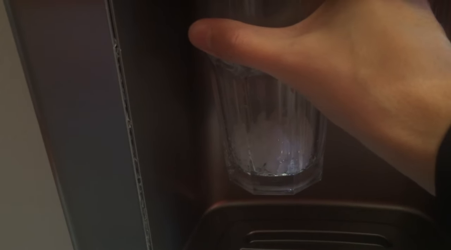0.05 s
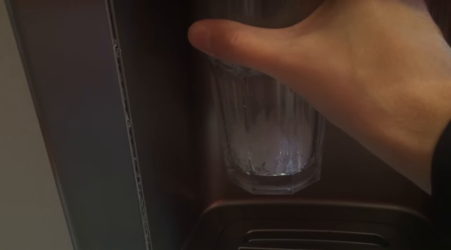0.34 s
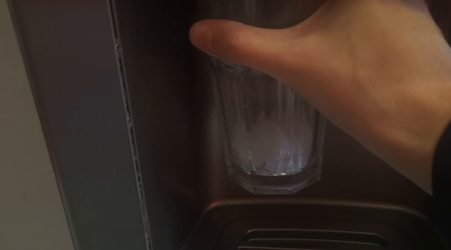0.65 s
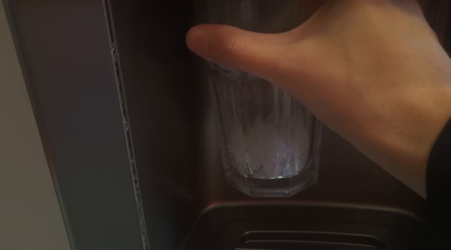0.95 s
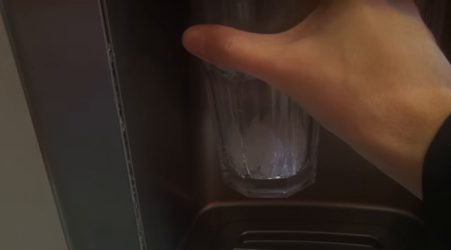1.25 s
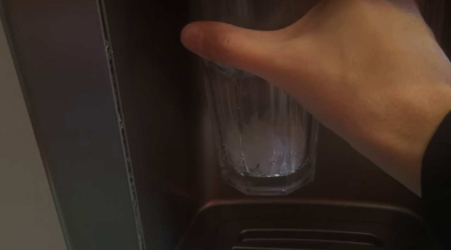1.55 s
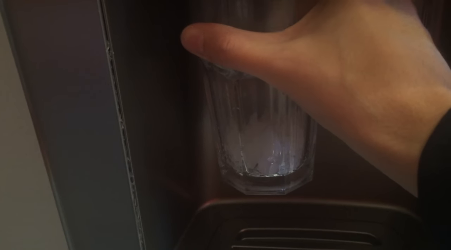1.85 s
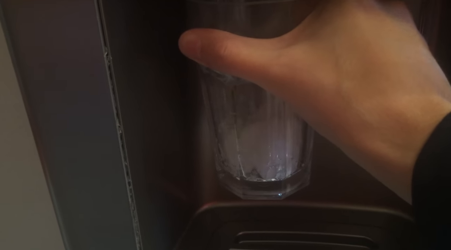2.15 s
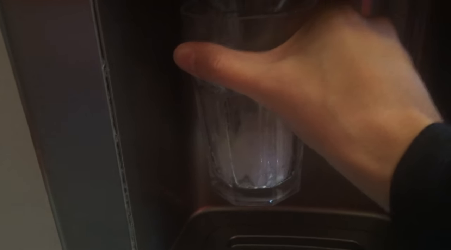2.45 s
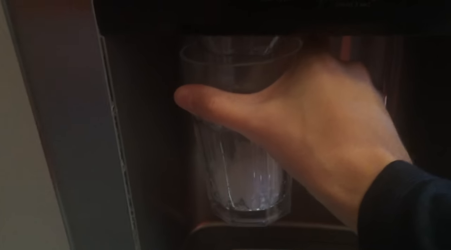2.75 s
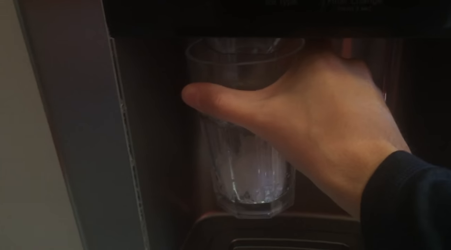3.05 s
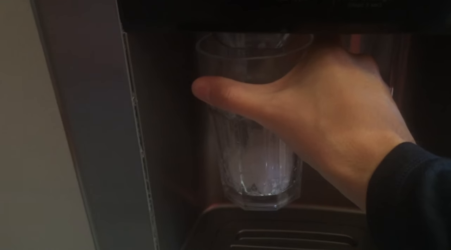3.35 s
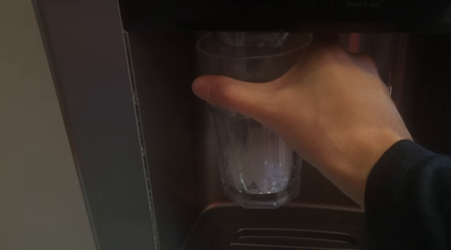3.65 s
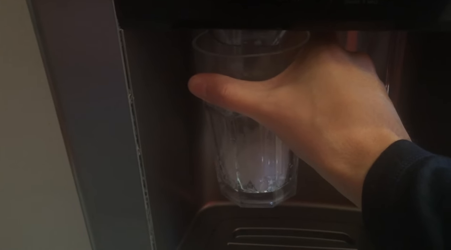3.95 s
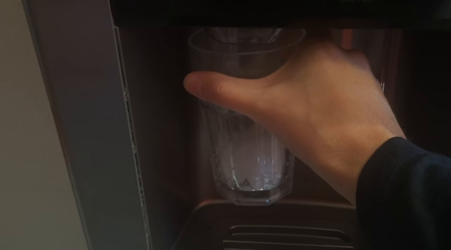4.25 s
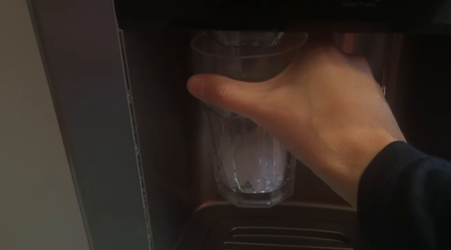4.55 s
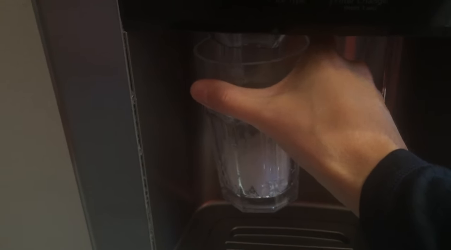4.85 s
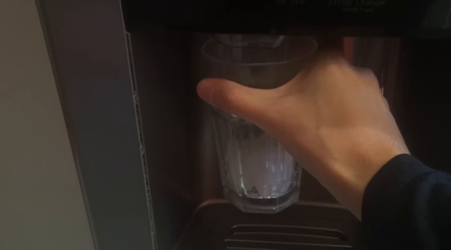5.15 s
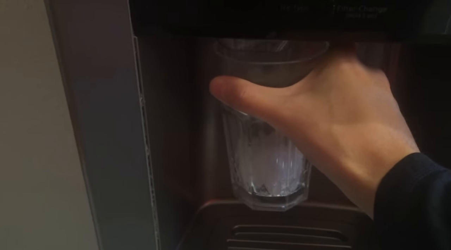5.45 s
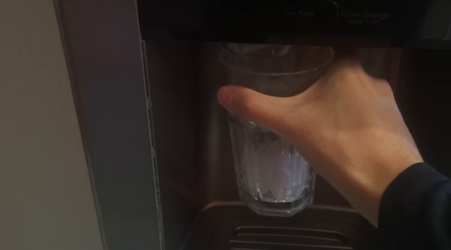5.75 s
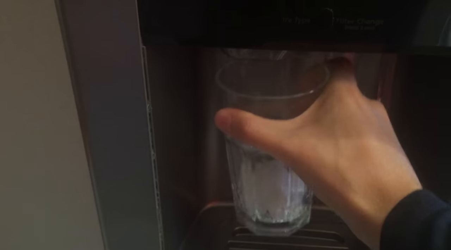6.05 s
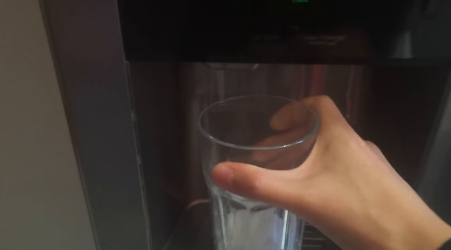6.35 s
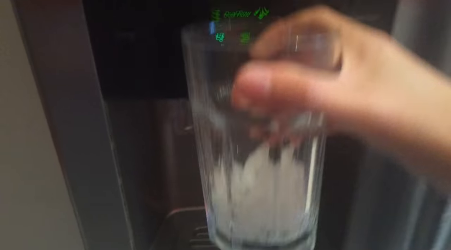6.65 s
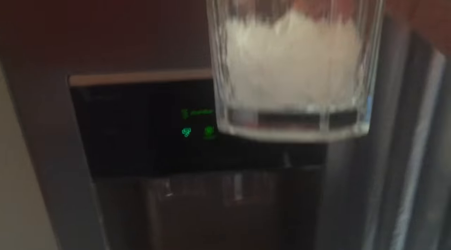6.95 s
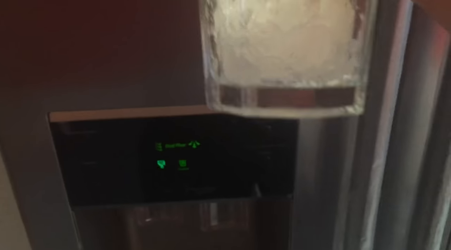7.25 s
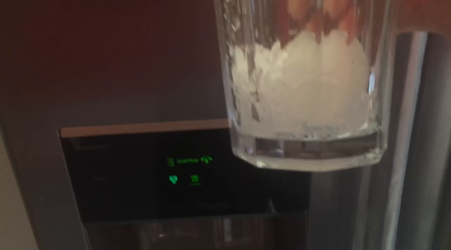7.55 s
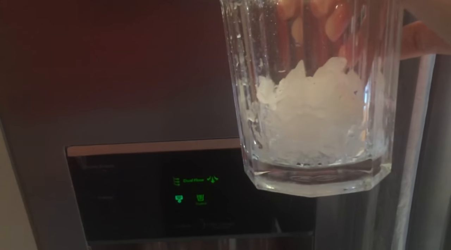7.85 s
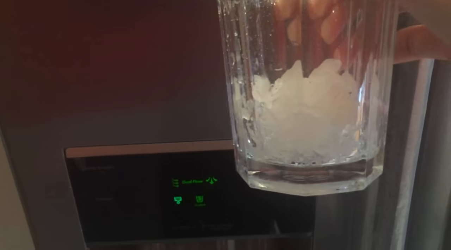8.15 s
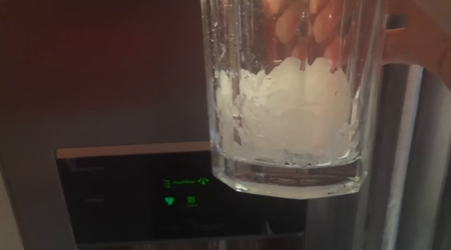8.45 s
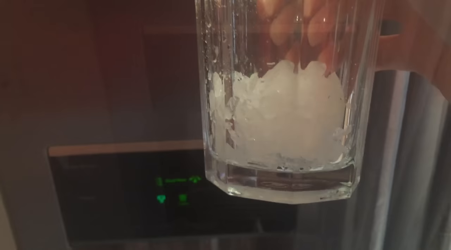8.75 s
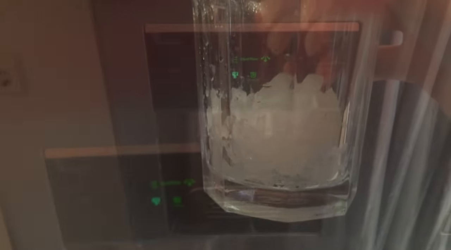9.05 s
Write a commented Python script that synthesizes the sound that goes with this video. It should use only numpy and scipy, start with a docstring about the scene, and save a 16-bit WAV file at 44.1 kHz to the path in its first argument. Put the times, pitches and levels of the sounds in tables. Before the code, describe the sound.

A refrigerator ice dispenser is running from the start, close to the microphone in a quiet kitchen. A geared motor hums and whirrs beneath uneven crunching as cubes crack and rattle inside a plastic housing. The crushing is loudest from about 1 to 2.4 seconds, with hollow thumps in the chute and a quick cluster of bright chips clinking into a glass around 2 seconds. More thumps come near 2.8 seconds and another sharp clink near 3.8. The grinding then thins to loose cubes knocking in the bin, before a final run of cracks from 4.8 seconds. The motor stops at about 5.2 seconds. Small plastic clicks follow until 6.3 seconds, then soft knocks and dull bumps as the glass is lifted away, with one more click and a brief rub at 8.5. Behind these, a very faint tick sounds once a second over low room tone.

```python
"""Crushed ice into a glass

A kitchen, one microphone close to the dispenser in the refrigerator door. A geared motor hums while
its blades grind and crack cubes in a plastic housing; chips drop and clink in a hand-held glass.
The motor stops, small clicks and soft bumps follow as the glass is lifted away, and farther off
something ticks faintly once a second."""
import sys
import numpy as np
from scipy import signal
from scipy.fft import rfft, irfft, next_fast_len
from scipy.io import wavfile
from scipy.ndimage import map_coordinates

SR = 44100
rng = np.random.default_rng(int(sys.argv[2]) if len(sys.argv) > 2 else 0)


def dump(signal):
    """Clip the signal to [-1, 1] and save it as 16-bit WAV at the path in sys.argv[1]."""
    limited = np.clip(np.atleast_2d(signal).T, -1, 1)
    pcm = np.round(limited * 32767).astype(np.int16)
    wavfile.write(sys.argv[1], SR, pcm)


N = 405719
TIME = np.arange(N) / SR
HIT = TIME[:SR // 4]  # time axis of one impact
STOP_S, SETTLED_S = 5.22, 5.5  # motor switched off, ice at rest
RING_ATTACK_S = .00087  # onset of ringing ice and glass


def amp(db):
    """Decibels to gain."""
    return 10 ** (np.asarray(db) / 20)


def unit(x):
    """x at rms 1."""
    return x / np.sqrt(np.mean(x ** 2) + 1e-20)


def along(points, hz):
    """(f/Hz, value) points read on a log axis."""
    f, v = np.transpose(points)
    return np.interp(np.log(hz + 1), np.log(f), v)


def curve(points):
    """(t/s, value) points read at every sample."""
    return np.interp(TIME, *np.transpose(points))


def wobble(rate):
    """A smooth random curve with rate knots a second."""
    return map_coordinates(rng.standard_normal(int(N * rate / SR) + 4), [TIME * rate])


def add(track, s, sound):
    """Mix a sound into the track at s seconds."""
    rest = track[max(round(s * SR), 0):][:len(sound)]
    rest += sound[:len(rest)]


def coloured(x, gain):
    """x through the causal (minimum-phase) filter with this gain of frequency."""
    m = 2 * next_fast_len(len(x) // 2 + SR // 8)
    cepstrum = irfft(np.log(np.maximum(gain(np.fft.rfftfreq(m, 1 / SR)), 1e-6)))
    cepstrum[1:m // 2] *= 2
    cepstrum[m // 2 + 1:] = 0
    return irfft(rfft(x, m) * np.exp(rfft(cepstrum)))[..., :len(x)]


def noise(spectrum):
    """Coloured noise of rms 1."""
    return unit(coloured(rng.standard_normal(N), lambda hz: amp(along(spectrum, hz))))


def burst(t60, attack):
    """The force of one fracture or rough contact: a fast-dying run of tiny random shocks."""
    return rng.standard_normal(len(HIT)) * amp(-60 * HIT / t60) * (1 - np.exp(-HIT / attack))


def detuned(hz, spread):
    """A sine for one impact, randomly a little off pitch."""
    return np.sin(2 * np.pi * hz * (1 + spread * rng.standard_normal()) * HIT)


def resonate(x, hz, q):
    """x through one resonance of unit peak gain."""
    return signal.lfilter(*signal.iirpeak(min(hz, SR / 4), max(q, 1), fs=SR), x)


def resonances(modes, hz):
    """Power gain of a set of (f/Hz, width/Hz, level/dB) resonances."""
    return sum(amp(db) ** 2 / (1 + (2 * (hz - centre) / width) ** 2) for centre, width, db in modes)


# Low, middle and high bands of a struck body: lower f/Hz, upper f/Hz
BODY_BANDS = [(150, 700), (700, 2800), (2800, 15500)]
def body(modes, colour, broad_db, cavity_db, cavity_t60, vary_db=2.0, detune=.005):
    """A body's impulse response in three bands; each spot struck favours other modes and walls."""
    spot = np.clip(rng.standard_normal((len(modes), 2)), -2, 2)
    struck = [(hz * (1 + detune * shift), width, db + vary_db * favour)
              for (hz, width, db), (shift, favour) in zip(modes, spot)]
    def gain(hz):
        return np.sqrt(resonances(struck, hz) + amp(broad_db + along(colour, hz)) ** 2)
    scatter = burst(cavity_t60, attack=.001)
    reflections = amp(cavity_db) * scatter / np.linalg.norm(scatter)
    ring = coloured(signal.unit_impulse(len(HIT)) + reflections, gain)
    return [signal.sosfilt(signal.butter(3, band, "band", fs=SR, output="sos"), ring)
            for band in BODY_BANDS]


# Room tone spectrum: f/Hz, level/dB
AIR_COLOUR = [(25, -26.5), (50, -5.5), (80, -11.5), (120, -6), (200, -4.5), (300, -14), (1070, -24),
              (14000, -43), (16000, -51)]
# Room tone over time: t/s, level/dB
AIR_LEVEL = [(5.6, -58.5), (6.4, -59.5), (7, -62), (8.5, -61.5), (8.85, -58)]
def room_tone():
    """The kitchen's low background all round the microphone."""
    return amp(curve(AIR_LEVEL)) * noise(AIR_COLOUR)


# Tones of the motor and gears: f/Hz, level/dB
MOTOR_TONES = [(100, -55), (199.2, -43.5), (296.1, -54.5), (376.8, -55.5), (656.8, -56), (979.8, -52.5),
               (1857, -56.5), (2299, -60)]
# The low hum under changing load: t/s, gain/dB
MOTOR_LOAD = [(0, -5.5), (.55, -3.5), (.78, 0), (1.5, -3), (3.15, -2.5), (3.72, 1.5), (3.9, -10), (4.5, -3),
              (5.2, -4)]
# Spectrum of the gears' whirr: f/Hz, level/dB
WHIRR_COLOUR = [(25, -45), (45, -18.5), (200, -6.5), (382, -3), (505, -19), (654, -10), (846, -12.5),
                (963, -7.5), (1420, -15.5), (2330, -13), (3360, -31), (6000, -43.5), (9000, -85)]
def motor(run_down_s=.039, hum_db=-2.0, whirr_db=-45.0, jolt_db=3.5, gears_from_hz=250):
    """Inside the door the motor hums and its gears whine and whirr, jolted by ice, until switch-off."""
    running = np.exp(-np.maximum(TIME - STOP_S, 0) / run_down_s)
    speed = 1 + .005 * wobble(7) + .008 * wobble(60)  # slow sway, fast judder
    shaft = np.cumsum(speed) / SR
    load_db, chafe_db = curve(MOTOR_LOAD), wobble(70)
    hum = np.zeros(N)
    for hz, db in MOTOR_TONES:
        level_db = db + load_db * (hz < gears_from_hz) + jolt_db * wobble(22) + chafe_db
        hum += amp(level_db) * np.sqrt(2) * np.sin(2 * np.pi * hz * shaft)
    whirr = amp(whirr_db + .66 * wobble(38)) * noise(WHIRR_COLOUR)
    return running * (amp(hum_db) * hum + whirr)


# Resonances of the chute and housing: f/Hz, width/Hz, level/dB
HOUSING_MODES = [(240, 40, -0.5), (355, 26, 4), (432.7, 110, -5.5), (659, 20, 0), (952, 110, -8),
                 (1210, 140, -5), (1330, 15, -3.5), (1748, 300, -4), (2290, 130, -6.5), (2900, 96, -11),
                 (3297, 36, -7.5), (3960, 130, -10.5), (4230, 60, -9.5), (4570, 110, -13.5),
                 (6147, 280, -18)]
# Broad colour of ice breaking inside: f/Hz, level/dB
ICE_COLOUR = [(59, -46), (100, -17), (193, -6.5), (302, -12), (365, 5.5), (535, -21), (648, -18),
              (801, -22.5), (2220, -10.5), (2690, -17.5), (6150, -25), (11600, -39), (16000, -64)]
def housing():
    """The crusher's plastic housing, struck at one spot."""
    return body(HOUSING_MODES, ICE_COLOUR, broad_db=3, cavity_db=-5.5, cavity_t60=.033)


# Cubes caught by the blades: t/s, length/s, level/dB, swell/dB, rumble offset/dB, spray offset/dB
BLADE_BITES = [(-.02, 0.12, -35, -10, -11.5, -3), (0.137, 0.086, -28, -3, -2.5, -3.5),
               (0.279, 0.094, -34, -0.5, -2, -6), (0.351, .11, -26.5, -3.5, -4.5, -10.5),
               (0.51, 0.059, -28, 0, -3.5, -13), (0.747, 0.14, -31.5, -5.5, -8, -11.5),
               (0.893, 0.2, -37.5, -4.5, -3.5, -19), (1.112, 0.04, -21.5, 6, -6.5, -7),
               (1.172, 0.011, -24, -1, 6.5, -9.5), (1.239, 0.13, -22.5, 2, -2, -4),
               (1.523, 0.128, -26, 5.5, -4, -5), (1.679, 0.18, -26.5, 5, 1, -8.5),
               (1.958, 0.3, -34.5, -3, -5, 2), (2.296, 0.4, -35.5, 2, -3, -12),
               (2.74, 0.088, -28, 2.5, 0.5, -12.5), (2.871, 0.15, -34.5, -9.5, -0.5, -7.5),
               (3.269, 0.18, -39, 7, -8.5, -9.5), (3.476, 0.093, -41.5, 9, -15, -11.5),
               (3.665, 0.03, -32.5, 5, -8, -12), (3.759, 0.083, -32, -4, -7, 0),
               (3.971, 0.22, -41, -12, -9, -20), (4.508, 0.29, -41.5, -0.5, -2.5, -18.5),
               (4.777, 0.035, -26.5, 2.5, -0.5, -10), (4.983, 0.2, -29, 6.5, -1, -11.5)]
def bite_levels(attack_s=.028):
    """Rumble, crunch and spray in dB: each bite sets in, swells while the cube holds, then dies away."""
    idle_dbs = (-51.5, -54, -67)  # between bites loose ice only tumbles round the bin
    falls_db_per_s = (169.5, 152.5, 192.5)
    t = TIME[:SR]
    onset = np.minimum(t / attack_s, 1)
    levels = []
    for layer, (idle_db, fall) in enumerate(zip(idle_dbs, falls_db_per_s)):
        power = amp(idle_db - fall * np.maximum(TIME - STOP_S, 0)) ** 2
        for s, length, db, swell, rumble, spray in BLADE_BITES:
            shape_db = swell * (np.minimum(t / length, 1) - .5) - fall * np.maximum(t - length, 0)
            add(power, s, (onset * amp(db + (rumble, 0, spray)[layer] + shape_db)) ** 2)
        levels.append(10 * np.log10(power + 1e-14))
    return levels


def grains(rate, spread_db):
    """Random tiny impacts, rate a second, of differing size."""
    impacts = (rng.random(N) < rate / SR) * rng.choice([-1, 1], N)
    return impacts * amp(spread_db * np.clip(rng.standard_normal(N), -2, 2))


def rattle(forces, spots=2, moves_per_s=9):
    """Ice travels round the housing, so its three bands fade between the responses of several spots."""
    bands = np.zeros((len(forces), N))
    weights = np.exp([wobble(moves_per_s) for _ in range(spots)])
    for weight in weights / np.linalg.norm(weights, axis=0):
        for band, force, ring in zip(bands, forces, housing()):
            band += weight * unit(signal.oaconvolve(force, ring)[:N])
    return [unit(band) for band in bands]


def tumbling(hz, spread, cycles, count, size_db=4):
    """Loose pieces collide, each ringing briefly at its own pitch; rms 1 while they last."""
    t = HIT[:SR // 30]
    pitch, size = np.clip(rng.standard_normal((count, 2)), -2, 2).T[:, :, None]
    turns = hz * np.exp(spread * pitch) * t
    envelopes = amp(size_db * size - 60 * turns / cycles) * (1 - np.exp(-turns))
    rings = envelopes * np.sin(2 * np.pi * turns)
    starts = (rng.random((count, 1)) * SETTLED_S * SR).astype(int)
    track = np.bincount((starts + np.arange(len(t))).ravel(), rings.ravel(), N)[:N]
    return unit(track) * np.sqrt(SETTLED_S * SR / N)


def grinding(rumble_db, crunch_db, spray_db):
    """Clumps of tiny fractures rattle the housing and shake the door; chunks and crumbs tumble."""
    clumps = amp(2.5 * wobble(90))
    coarse = clumps * grains(rate=2600, spread_db=2.0)
    fine = clumps * grains(rate=1600, spread_db=4.0)
    low, middle, high = rattle((coarse, coarse, fine))
    walls = amp(rumble_db - 2) * low + amp(crunch_db - 1.5) * middle + amp(spray_db - 5) * high
    door_colour = [(28, -33.5), (50, -6.5), (95, -1.5), (135, .5), (190, -13), (400, -56)]
    door = amp(rumble_db - 17) * noise(door_colour)
    chunks = amp(crunch_db - 10) * tumbling(hz=1494, spread=.35, cycles=24, count=1000)
    crumbs = amp(spray_db - 10.5) * tumbling(hz=3610, spread=.28, cycles=57, count=1600)
    specks_on_glass = amp(spray_db - 19.5) * tumbling(hz=6100, spread=.038, cycles=240, count=170)
    return walls + door + chunks + crumbs + specks_on_glass


def fizzed(x, spray_db, above_hz=7500):
    """The denser the spray, the finer the chips and the more top treble they carry."""
    top = signal.sosfiltfilt(signal.butter(2, above_hz, "high", fs=SR, output="sos"), x)
    fizz_db = np.interp(spray_db, [-44.5, -33], [-7.5, 4])  # sparse to dense spray
    return x + (amp(fizz_db) - 1) * top


# Reverberation of the kitchen: f/Hz, t60/s
KITCHEN_DECAY = [(200, 0.25), (550, 0.16), (1400, 0.35), (3700, 0.11), (10000, 0.24)]
def kitchen_echo(x):
    """What the walls return to the microphone: each frequency dies at its own speed."""
    hz, t, spectrum = signal.stft(rng.standard_normal(SR // 2), SR, nperseg=256)
    decay = amp(-60 * t / along(KITCHEN_DECAY, hz)[:, None])
    tail = signal.istft(spectrum * decay, SR, nperseg=256)[1]
    tail *= 1 - np.exp(-TIME[:len(tail)] / .0074)
    return signal.fftconvolve(x, tail / np.linalg.norm(tail))[:N]


# Modes of a hard piece of ice: f/Hz, level/dB
SHARD_MODES = [(1938, 0), (3250, -4.5), (3750, 0.5), (4200, -1.5)]
def shard(t60=.033, spread=.03):
    """The brief clink of one piece of ice; no two ring quite alike."""
    ring = sum(amp(db) * np.sin(2 * np.pi * hz * np.exp(spread * rng.standard_normal()) * HIT)
               for hz, db in SHARD_MODES)
    return unit(ring * amp(-60 * HIT / t60) * (1 - np.exp(-HIT / RING_ATTACK_S)))


def blows(rows, strike, attack, crumble_t60, crumble_db, thud_t60, thud_db, crunch_db, snap_db,
          knock_db, knock_q, clink_db=None):
    """Sharp pitched blows drive a body: low thud, middle crunch, high snap; ice also clinks."""
    track = np.zeros(N)
    for s, db, thud, snap, hz in rows:
        fracture = burst(t60=.023, attack=attack) + amp(crumble_db) * burst(crumble_t60, attack=.0035)
        push = burst(thud_t60, attack=.0031)  # the heavy panels move longest
        push, knock = (force + amp(knock_db) * resonate(force, hz, knock_q) for force in (push, fracture))
        shares_db = (thud + thud_db, crunch_db, snap + snap_db)
        for force, ring, share in zip((push, knock, knock), strike(), shares_db):
            add(track, s, amp(db + share) * unit(signal.fftconvolve(force, ring)[:len(HIT)]))
        if clink_db is not None:
            add(track, s + attack, amp(db + snap + clink_db) * shard())
    return track


# Cubes cracking: t/s, level/dB, thud offset/dB, snap offset/dB, knock f/Hz
CUBE_CRACKS = [(.049, -24.5, -2, -8, 1200), (.177, -18.5, 0.5, 1, 1610), (.222, -15.5, -20, -6, 2000),
               (.283, -18.5, -33, -4.5, 1700), (.54, -20, -4, -14, 1790), (.561, -16.5, -6.5, -10.5, 1300),
               (.726, -27.5, -16, -17.5, 1600), (.759, -17, -29, -9, 2150), (.806, -20, -20, -15, 1850),
               (.877, -19.5, -16.5, -21, 1700), (.953, -14, -26, -13, 1700),
               (.984, -15.5, -29, -16.5, 2020), (1.159, -8, -12, -11.5, 2200),
               (1.178, -5.5, -2.5, -11, 2220), (1.386, -11, 1.5, -9.5, 655), (1.59, -14, -16, -9.5, 1130),
               (1.632, -11, -11.5, -11, 1530), (1.69, -12, -9, -15, 1770), (1.708, -14.5, -21.5, -6, 1740),
               (1.728, -11, -12.5, -7, 2030), (1.749, -15, -15, -5, 1640), (1.794, -10.5, -7, -12, 950),
               (1.858, -11.5, -12, -5.5, 2250), (1.899, -10, -10.5, -5.5, 1440),
               (1.94, -5.5, -27.5, -14, 1940), (1.95, -12, -25, -3.5, 2200), (2.058, -13, -23, -2, 1550),
               (2.532, -22, -4, -15.5, 1220), (2.671, -23, -13, -16.5, 1800), (2.729, -22.5, 2, -7, 660),
               (2.782, -11.5, -17.5, -11, 950), (2.793, -14, -4.5, -9.5, 1296),
               (2.973, -21.5, -11, -15, 1185), (3.306, -23.5, -7, -4.5, 1910),
               (3.356, -19.5, -12, -13, 1690), (3.497, -27.5, -2.5, -5.5, 2000),
               (3.585, -25, -15.5, -10.5, 1940), (3.656, -15, -22.5, -3.5, 2570),
               (3.754, -12.5, -17, -7.5, 1460), (4.778, -17, -15, -16, 980), (4.805, -18, -14, -13.5, 1004),
               (4.821, -23.5, -12, -5.5, 2200), (4.974, -19, -5, -9, 1520), (5.132, -14.5, -21, -17, 1800),
               (5.163, -15, -16, -16.5, 1620), (5.185, -18, -8, -14, 1840), (5.208, -13, -1.5, -12.5, 1820)]
def cracks():
    """Cubes break and crumble under the blades, jolting the housing."""
    return blows(CUBE_CRACKS, housing, attack=.0019, crumble_t60=.078, crumble_db=-13, thud_t60=.05,
                 thud_db=-21, crunch_db=-22, snap_db=-21, knock_db=6.5, knock_q=9.6, clink_db=-26)


# Modes of the glass, damped by hand and ice: f/Hz, level/dB, t60/s
GLASS_MODES = [(2344, -0.5, 0.062), (4640, -5.5, 0.022), (6310, -2, 0.019), (8980, -14.5, 0.022)]
# Spectrum of a chip splintering: f/Hz, level/dB
SPLINTER_COLOUR = [(590, -43), (1000, -20), (1940, -6), (4570, -8), (6470, -5.5), (7100, -10.5),
                   (14600, -25), (16000, -44)]
# Chips landing: t/s, level/dB, low ring offset/dB, high ring offset/dB, splinter offset/dB, rim f/Hz
LANDINGS = [(0.6539, -26.5, -13.5, -11, -26, 6380), (1.5538, -11, -26, -9.5, -7, 6240),
            (1.7278, -3, -24, -13, -11, 6240), (1.9767, 0, -17, -7, -17.5, 6270),
            (2.0318, -10, -15, -16, -6.5, 6240), (2.0643, -11, -18, -8, -11, 6240),
            (2.0823, -5.5, -5, -28, -16.5, 6240), (2.098, -14, -4, -17, -9, 6240),
            (2.116, -8, -6.5, -12.5, -17, 6240), (2.125, -13.5, -20, -11, -6.5, 6240),
            (2.187, 6.5, -27.5, -22.5, -13, 6560), (2.226, -19, -6, -20, -14, 6240),
            (2.2947, -5.5, -32, -10, -11.5, 6620), (2.302, -7.5, -30.5, -22, -11, 6240),
            (2.316, -8.5, -23.5, -12, -9.5, 6240), (2.3741, -6, -7.5, -9, -19.5, 6260),
            (2.8676, -24, -5.5, -10.5, -16, 6000), (3.407, -30, -16, -23, -7.5, 6400),
            (3.424, -21, -6, -13.5, -26, 6430), (3.655, -15, -14, -25, -11, 6240),
            (3.7593, 2, -19.5, -27, -11, 6150), (3.799, -21.5, -1, -11, -11, 6300),
            (4.9482, -16, -13.5, -22, -9, 5900)]
def chips(ring_db=-20, splinter_db=-21, shard_db=-23, linger_db=-31, linger_t60=.16, dulling=.7):
    """Near the microphone chips splinter in the glass; where each lands decides which modes ring."""
    track = np.zeros(N)
    for s, db, low, high, splinter, rim_hz in LANDINGS:
        def dull_db(hz):  # softer landings lose treble above the rim's pitch
            return dulling * min(db, 0) * np.log2(np.maximum(hz / rim_hz, 1))
        fracture = burst(t60=.024, attack=.00099)
        crack = unit(coloured(fracture, lambda hz: amp(along(SPLINTER_COLOUR, hz) + dull_db(hz))))
        add(track, s, amp(db + splinter) * (amp(splinter_db) * crack + amp(shard_db) * shard()))
        shares_db = (low, splinter, high, high)
        tunings = (1, 1, rim_hz / GLASS_MODES[2][0], 1)
        for (hz, level, t60), share, tuning in zip(GLASS_MODES, shares_db, tunings):
            # ice rattling against the wall roughens the phase
            drift = np.cumsum(rng.standard_normal(len(HIT))) / np.sqrt(SR / 200)
            pitch = hz * tuning * (1 + .007 * rng.standard_normal())
            decay = amp(-60 * HIT / t60) + amp(linger_db - 60 * HIT / linger_t60)  # the rim rings on
            ring = np.sin(2 * np.pi * pitch * HIT + drift) * decay * (1 - np.exp(-HIT / RING_ATTACK_S))
            add(track, s, amp(db + share + level + ring_db + dull_db(hz)) * unit(ring))
    return track


# Modes of the hollow chute: f/Hz, level/dB, t60/s
CHUTE_MODES = [(352, -2, 0.087), (413, 2, 0.087), (659, -2, .12), (730, -3.5, 0.082), (1045, 1, 0.033),
               (1176, 4.5, 0.054), (1335, -9.5, .07)]
# Whole lumps thumping it: t/s, level/dB, favoured f/Hz
LUMPS = [(1.179, -8.5, 380), (1.5901, -1.5, 1043), (2.453, -24.5, 600), (2.729, -23.5, 434),
         (2.745, -19, 715), (2.793, -11, 687), (2.795, -12.5, 355), (2.824, -19, 355), (2.893, -22, 1200)]
def thuds(level_db=-1, reach_octaves=.18, attack=.0005):
    """A lump hits the chute squarely and rings the modes near the pitch its contact favours."""
    track = np.zeros(N)
    for s, db, favoured_hz in LUMPS:
        ring = np.zeros(len(HIT))
        for hz, level, t60 in CHUTE_MODES:
            nearness = 1 / (1 + (np.log2(hz / favoured_hz) / reach_octaves) ** 2) ** 2
            ring += nearness * amp(level - 60 * HIT / t60) * detuned(hz, .008)
        ring *= 1 - np.exp(-HIT / attack)
        add(track, s, amp(db + level_db) * ring / np.abs(ring).max())
    return track


# Resonances of the closed bin: f/Hz, width/Hz, level/dB
BIN_MODES = [(1190, 150, 1), (1780, 280, -1), (2243, 200, -4.5), (2876, 120, 0), (3130, 60, -0.5),
             (3780, 140, -6), (5600, 280, -14.5)]
# Its broad colour: f/Hz, level/dB
BIN_COLOUR = [(100, -11), (350, 2.5), (600, -11), (2400, -12), (4300, -17.5), (6000, -34), (16000, -62)]
# Loose cubes tapping: t/s, level/dB, thud offset/dB, snap offset/dB, knock f/Hz
CUBE_TAPS = [(3.112, -34, -19, -20, 1970), (3.16, -31.5, -21, -7.5, 2550), (3.223, -31.5, -25, -5.5, 2370),
             (3.392, -23, -16, -8.5, 2210), (3.553, -26.5, -15, -6.5, 2406), (3.741, -12.5, -24, -13, 1655),
             (4.003, -28.5, -9, -8.5, 1180), (4.1185, -18.5, -21, -11.5, 2490),
             (4.271, -23.5, -13.5, -16.5, 1160), (4.328, -27, -12.5, -17, 1210),
             (4.387, -24.5, -16, -14, 1240), (4.639, -28.5, -12, -5.5, 1920)]
def taps():
    """Loose cubes knock round the bin, heard through its closed walls."""
    def ice_bin():
        return body(BIN_MODES, BIN_COLOUR, broad_db=2.5, cavity_db=-3.5, cavity_t60=.045)
    return blows(CUBE_TAPS, ice_bin, attack=.003, crumble_t60=.083, crumble_db=-10.5, thud_t60=.079,
                 thud_db=-14, crunch_db=-22, snap_db=-26, knock_db=1.5, knock_q=8, clink_db=-27.5)


# Resonances of the clicking plastic: f/Hz, width/Hz, level/dB
PLASTIC_MODES = [(331.5, 62, -7), (400, 89, 2.5), (647, 15, 7), (1048, 38, 3), (1580, 220, 0),
                 (1990, 170, -1.5), (3420, 520, -0.5)]
# Its broad colour: f/Hz, level/dB
PLASTIC_COLOUR = [(100, -25), (300, -22), (800, -12), (2200, -3), (3000, -19), (6300, -13.5), (8500, -57)]
def plastic():
    """The plastic at the front of the dispenser, touched at one spot."""
    return body(PLASTIC_MODES, PLASTIC_COLOUR, broad_db=3, cavity_db=-9.5, cavity_t60=.013)


# Small dry clicks: t/s, level/dB, thud offset/dB, snap offset/dB, knock f/Hz
CLICKS = [(5.454, -32.5, -7, -23.5, 2100), (5.47, -36.5, -3, -19, 1000), (5.511, -24, -13.5, -7, 1960),
          (5.633, -36, -9, -12.5, 634), (6.008, -29.5, -11, -7.5, 1037), (6.288, -30, -12, -8.5, 2800),
          (8.532, -27, -14.5, -10.5, 1041)]
def clicks():
    """Plastic clicks as the lever lets go and the glass is drawn away."""
    return blows(CLICKS, plastic, attack=.001, crumble_t60=.088, crumble_db=-11, thud_t60=.13,
                 thud_db=-14, crunch_db=-22.5, snap_db=-22.5, knock_db=-7, knock_q=6.9)


# Resonances of a tick: f/Hz, width/Hz, level/dB
TICK_MODES = [(1410, 80, -1), (1580, 200, -3), (2160, 130, -4), (4350, 480, -9)]
# Ticks a second apart: t/s, level/dB
TICKS = [(5.745, -64), (6.745, -65.5), (7.745, -60), (8.745, -59)]
def ticking(t60=.22, attack=.016):
    """A faint ringing tick, like a wall clock across the room."""
    track = np.zeros(N)
    for s, db in TICKS:
        tick = coloured(burst(t60, attack), lambda hz: np.sqrt(resonances(TICK_MODES, hz)))
        add(track, s, amp(db - 7) * unit(tick))
    return track


# Soft handling bumps: t/s, level/dB, f/Hz
BUMPS = [(5.829, -38, 90), (7.461, -43.5, 95), (8.579, -43, 67.5), (8.731, -43.5, 132)]
def bumps(t60=.075, attack=.0022):
    """Dull thumps of handling, each one low damped tone."""
    track = np.zeros(N)
    for s, db, hz in BUMPS:
        envelope = amp(db - 60 * HIT / t60) * (1 - np.exp(-HIT / attack))
        add(track, s, envelope * np.sin(2 * np.pi * hz * HIT))
    return track


# Modes of a small hollow shell: f/Hz, level/dB, t60/s
SHELL_MODES = [(334, -2.5, 0.14), (382, -3.5, 0.16), (1041, -2, 0.053), (1600, 1.5, 0.02),
               (2184, -6, 0.034), (3530, -11.5, 0.016), (4460, -16, .016)]
# Knocks and scuffs of handling: t/s, level/dB, brightness/(dB per octave), contact/s
KNOCKS = [(6.5212, -37, 2.5, 0.025), (7.2505, -34.5, 1, 0.028), (8.710, -46, 2, 0.063),
          (9.171, -46, -1, 0.049)]
def knocks(scuff_db=-5, rise_share=.2):
    """Rough contacts scuff and ring the shell, each at its own brightness; longer ones start softly."""
    track = np.zeros(N)
    for s, db, brightness, contact in KNOCKS:
        ring = np.zeros(len(HIT))
        for hz, level, t60 in SHELL_MODES:
            mode = detuned(hz, .024) * amp(-60 * HIT / t60)
            rung = signal.fftconvolve(burst(contact, rise_share * contact), mode)[:len(HIT)]
            tilt_db = brightness * np.log2(hz / SHELL_MODES[2][0])
            ring += amp(level + tilt_db) * unit(rung) * np.std(mode)
        scuff = resonate(burst(2 * contact, rise_share * contact), hz=1700, q=1.5)
        add(track, s, amp(db) * (ring + amp(scuff_db + brightness) * scuff))
    return track


def slide(start_s=8.535, length_s=.064, level_db=-50, fall_db_per_s=130, edge_s=.013):
    """After the last click the touching surfaces slip on with a short, fading rustle."""
    rub = unit(signal.fftconvolve(rng.standard_normal(N), sum(plastic()))[:N])
    t = np.maximum(TIME - start_s, 0)
    gate = np.clip(np.minimum(t, length_s + edge_s - t) / edge_s, 0, 1)
    return amp(level_db - fall_db_per_s * t) * rub * gate


def scene():
    """In mono from beside the door: crusher, glass and handling up close, the kitchen behind."""
    cracking, tapping = cracks(), taps()
    handling = clicks() + knocks() + slide()
    rumble_db, crunch_db, spray_db = bite_levels()
    breaking_ice = fizzed(cracking + grinding(rumble_db, crunch_db, spray_db), spray_db)
    crusher = breaking_ice + tapping + thuds() + motor()
    glass = chips()
    echo = kitchen_echo(amp(-12.5) * (crusher + glass) + amp(-13.5) * handling)
    return (crusher + glass + handling + echo + room_tone() + bumps() + ticking())[None]


def record(dry, top_hz=15900):
    """The microphone's signal saturates at full scale and keeps nothing above the band limit."""
    m = next_fast_len(N + SR // 2)
    passband = np.fft.rfftfreq(m, 1 / SR) < top_hz
    return irfft(rfft(np.clip(dry, -1, 1), m) * passband, m)[..., :N]


dry = scene()
out = record(dry)
dump(out)
```